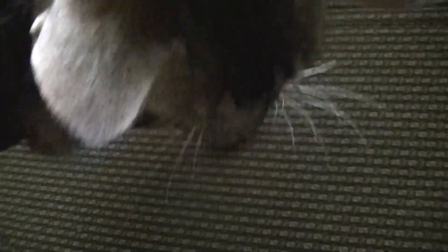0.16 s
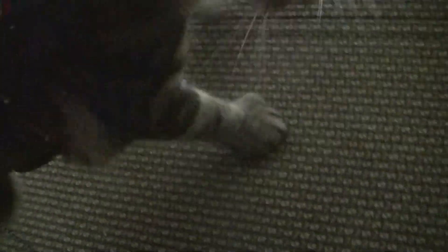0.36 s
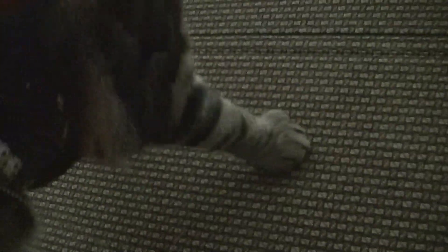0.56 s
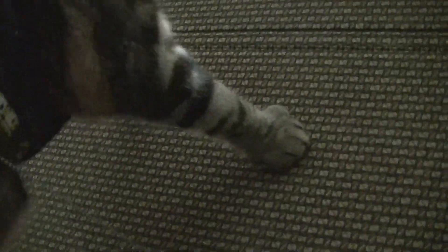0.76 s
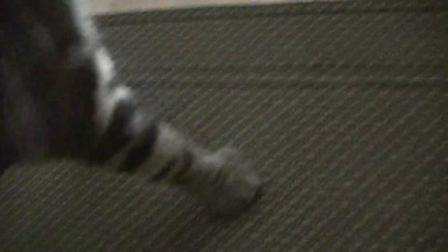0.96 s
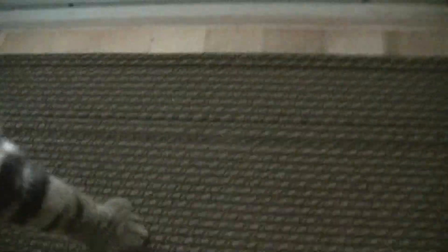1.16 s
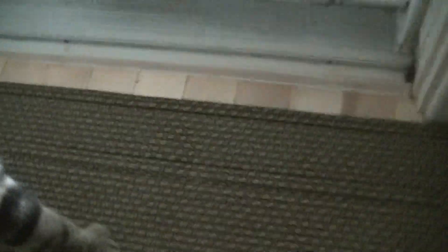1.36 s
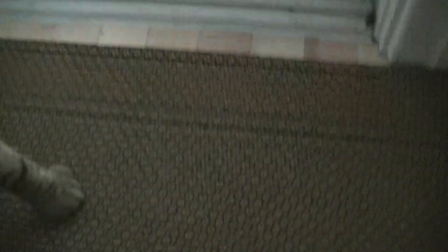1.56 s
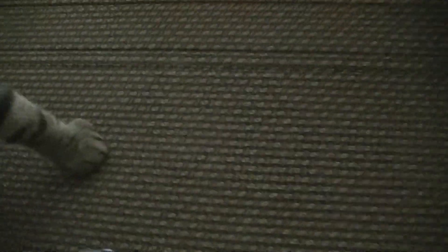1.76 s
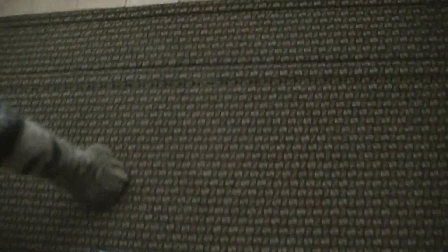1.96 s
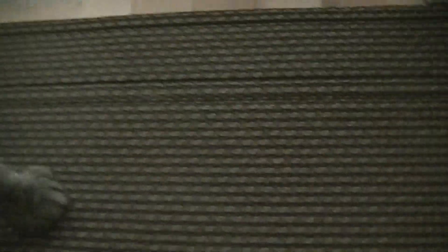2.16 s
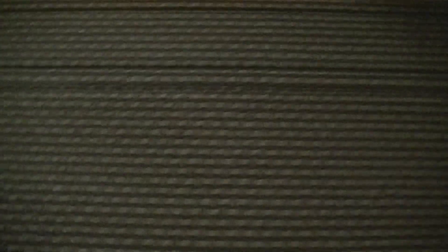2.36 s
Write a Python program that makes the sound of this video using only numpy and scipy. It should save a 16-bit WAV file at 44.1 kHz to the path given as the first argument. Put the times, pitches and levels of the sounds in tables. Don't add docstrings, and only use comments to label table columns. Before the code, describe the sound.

Cat claws catching on a stiff woven mat, close and dry. Near-quiet until sharp, loud snaps at 0.22 and 0.31 s with a brief rasping drag between; faint ticks follow. A dull paw thump and crisp snaps come at 0.79 s, then scratchy crackles to 1.1 s. Lighter clicks at 1.25-1.5, 1.7 and 2.0-2.1 s, and a small flurry at 2.2-2.3 s, over faint rustle and low room hum.

```python
import sys
import numpy as np
from scipy import signal
from scipy.fft import rfft, irfft
from scipy.io import wavfile

SR = 44100
rng = np.random.default_rng(int(sys.argv[2]) if len(sys.argv) > 2 else 0)


def wav_record(signal):
    frames = np.transpose(np.atleast_2d(signal))
    bounded = np.clip(frames, -1, 1)
    quanta = np.round(bounded * 32767).astype(np.int16)
    wavfile.write(sys.argv[1], SR, quanta)


def voltage_ratio(level):
    return 10 ** (np.asarray(level, float) / 20)


N = 105840

# frequency in Hz, level in dB per Hz.
ROOM_TONE = [(15, -33), (25, 8), (144, 2.5), (631, -5.5), (782, -6), (2300, -15.5), (3440, -19.5),
             (6920, -22), (15500, -11.5)]
# time in seconds, level in dB.
RESTLESSNESS = [(0, -44.5), (.14, -53), (.27, -45), (.43, -48), (.57, -44.5), (.74, -52.5), (0.902, -43.5),
                (.97, -45.5), (1.12, -45.5), (1.18, -52.5), (1.239, -47), (1.34, -47), (1.48, -46),
                (1.66, -52.5), (1.8, -47), (2.02, -53), (2.2, -52.5), (2.4, -52.5)]
# frequency in Hz, level in dB per Hz.
RUSTLE_COLOUR = [(180, -10.5), (420, -0.5), (1300, -6.5), (2000, -6), (2600, -2), (3400, -6), (5000, -11.5),
                 (15500, -15.5)]
# start in seconds, level in dB, decay t60 in seconds, top in Hz.
PAW_THUMPS = [(.001, -46.5, 0.28, 308), (0.235, -52, 0.19, 520), (.318, -42.5, 0.47, 177),
              (0.587, -54, 0.19, 300), (.786, -30, 0.049, 400), (.812, -34, 0.37, 203),
              (1.095, -36.5, 0.072, 366), (1.258, -42.5, 0.1, 586), (1.288, -42.5, 0.22, 410),
              (1.396, -43, 0.1, 560), (1.43, -52, 0.49, 256), (2.1, -51.5, 0.23, 170),
              (2.339, -52, 0.19, 142), (2.262, -45, 0.29, 417), (2.288, -43.5, 0.2, 317)]
# start in seconds, peak in dB, pitch in Hz,
# ring length in cycles.
CONTACT_KNOCKS = [(.02, -39.5, 108.6, 9), (.035, -41, 910, 20), (0.2254, -7, 1940, 3.9),
                  (0.2248, -13.5, 1066, 13.3), (0.2267, -23, 616, 9.5), (.238, -29, 610, 9.7),
                  (.234, -20, 2330, 12), (.3362, -16, 1800, 5.3), (0.345, -9.5, 1630, 3.3),
                  (.361, -24, 2000, 8.2), (.548, -36.5, 2790, 24), (.5855, -36, 3250, 15),
                  (0.592, -40, 950, 10), (.59, -40.5, 167, 9.6), (.6535, -37.5, 2960, 18),
                  (.673, -42, 2530, 18), (0.785, -21, 159, 5.2), (.788, -22.5, 365, 7.6),
                  (.808, -30, 270, 8.2), (0.8506, -17, 780, 2.2), (.989, -24.5, 890, 3.7),
                  (1.007, -31.5, 583, 9.9), (1.069, -39.5, 116, 11), (1.1, -29.5, 840, 1.6),
                  (1.292, -30, 386, 8.2), (1.3935, -20.5, 654, 5.2), (1.397, -28.5, 349, 9.6),
                  (1.395, -33, 136, 6.8), (1.972, -31.5, 1197, 16), (1.978, -36.5, 714, 9.2),
                  (1.976, -38.5, 2060, 77), (1.987, -37, 1150, 12), (2.065, -33.5, 680, 9),
                  (2.065, -36.5, 2370, 31), (2.099, -43, 2070, 53), (2.214, -39.5, 700, 10.4),
                  (2.2162, -27, 1160, 5.7), (2.28, -36.5, 105, 9.4), (2.272, -27, 1490, 2.4),
                  (2.2866, -19, 1670, 2.5), (2.293, -31.5, 410, 2.8), (2.298, -29.5, 606, 1.9),
                  (2.306, -32, 920, 3.6), (2.311, -21.5, 1200, 3.1)]
# start in seconds, length in seconds, level in dB, pitch in Hz.
CLAW_RASPS = [(0.267, 0.037, -33.5, 3180), (0.277, 0.042, -36, 6000), (.315, 0.093, -46, 5320),
              (0.359, 0.047, -45, 1570), (0.976, 0.03, -42, 4600), (1.07, 0.036, -42.5, 2390),
              (1.097, 0.15, -64, 2400), (1.328, 0.047, -52, 2480), (1.442, 0.19, -58, 2430),
              (1.98, 0.046, -58.5, 2920), (0.95, 0.063, -42, 12900), (2.285, .05, -46, 13500),
              (1.211, .06, -50, 6500)]
# start in seconds, length in seconds, level in dB, pitch in Hz,
# share of the stroke that swells (0 to 1).
CLAW_DRAGS = [(0.035, 0.059, -56, 3240, 0.62), (0.234, 0.012, -38.5, 7000, 0.086),
              (0.26, 0.059, -30.5, 3420, 0.6), (0.316, 0.041, -29, 1550, 0.083),
              (0.327, 0.086, -55, 4640, 0.21), (0.792, 0.0071, -43, 2100, 0.057),
              (0.821, 0.017, -35, 2180, 1), (0.848, 0.021, -36, 2380, 0.93), (0.942, 0.069, -41, 8000, 0.5),
              (0.977, 0.034, -38, 1770, 0.41), (1.026, 0.035, -43, 3420, 0.34),
              (1.061, 0.04, -37.5, 3900, 0.28), (1.116, 0.048, -51, 5500, 0.44),
              (1.248, 0.068, -39.5, 950, 0.27), (1.423, 0.098, -50, 2500, 0.099),
              (1.702, 0.024, -41, 1780, 0.17), (1.762, 0.061, -45, 2720, 0.15),
              (2.315, 0.032, -49.5, 2400, .2), (2.089, 0.015, -44, 2280, 0.33), (.64, 0.091, -51, 2800, .4),
              (2.186, 0.082, -48, 11000, 0.24), (2.206, 0.042, -43, 1750, 0.33),
              (2.258, 0.03, -41.5, 2540, 0.42), (2.283, 0.056, -42, 1730, 0.37)]
# frequency in Hz, level in dB.
WEAVE_MODES = [(680, 2.5), (1050, 2.5), (1240, 4), (1490, 1), (1820, 2.5), (2050, 4), (2400, 2),
               (2900, 2.5), (3700, -2.5), (4400, 2.5), (5200, 0), (6600, -6), (8400, -9.5), (12500, -3)]
# start in seconds, peak in dB, pitch in Hz,
# sharp edge in dB, aftershock time in seconds.
STRONG_SNAPS = [(.224, -10.5, 1550, -14, 0.0044), (0.2246, -7.5, 2740, -20.5, 0.0035),
                (0.26, -21, 3200, -31, 0.003), (0.3101, -1.5, 1660, -45, 0.0029),
                (.31, 0, 4460, -21, 0.0028), (0.3346, -31, 1800, -38, 0.00077),
                (.344, -14.5, 1620, -40, 0.0019), (0.7837, -19.5, 736, -36, 0.00067),
                (.787, -6.5, 1816, -22, 0.0012), (0.7869, -7.5, 4950, -10.5, 0.0024),
                (0.7901, -11, 2070, -19.5, 0.0047), (0.8545, -16, 2830, -13, 0.0017),
                (.867, -19, 2040, -12, 0.0014), (.987, -21.5, 4500, -4.5, 0.0032),
                (0.9958, -13, 4170, -11.5, 0.0012), (1.001, -19.5, 2600, -19, 0.0032),
                (1.025, -22, 2430, -10.5, 0.003), (1.082, -24, 2460, -5.5, 0.0096)]
# start in seconds, peak in dB, pitch in Hz,
# sharp edge in dB, aftershock time in seconds.
LIGHT_SNAPS = [(1.253, -23.5, 697, -14, 0.012), (1.395, -23.5, 1090, -12, 0.00094),
               (1.4187, -24, 2680, -10.5, 0.0062), (1.704, -27, 1390, -10.5, 0.0079),
               (1.972, -26, 2450, -16, 0.0058), (2.063, -31.5, 3500, -12, 0.0045),
               (2.096, -33, 870, -7.5, 0.0031), (2.213, -21, 1150, -12, 0.0025),
               (2.227, -29.5, 3060, -9.5, 0.0013), (2.26, -24, 1240, -5, 0.0017),
               (2.285, -20, 1610, -13, 0.0044), (2.31, -24.5, 1330, -11, 0.0029)]
# start in seconds, peak in dB, pitch in Hz, sharp edge in dB,
# aftershock time in seconds.
FIBRE_TICKS = [
    (0.46, -31.5, 3170, -17, 0.0065),
    (0.624, -30, 2780, -28, 0.0038),
    (0.707, -40, 6540, 2, .001),
    (.75, -38, 9900, 1, 0.00082),
    (1.262, -25, 4800, -10.5, 0.0018),
    (1.3135, -24.5, 2440, -32, 0.0035),
    (1.488, -29.5, 4000, -14, 0.0035),
    (1.628, -27.5, 8700, -3, 0.002),
    (1.931, -36.5, 2900, -24, 0.003),
    (2.292, -36, 12500, 0, 0.0057),
]

DRAG_GRAINS_PER_S = 12000


def rms_one(x):
    return x / np.sqrt(np.mean(x ** 2) + 1e-20)


def level_at(points, hz):
    table_hz, table_db = np.transpose(points)
    return np.interp(np.log(hz), np.log(table_hz), table_db)


def shaped(x, spectrum):
    hz = np.arange(len(x) // 2 + 1) * SR / len(x) + 1
    return rms_one(irfft(rfft(x) * voltage_ratio(level_at(spectrum, hz)), len(x)))


def filtered(x, order, hz, kind):
    return signal.sosfilt(signal.butter(order, hz, kind, fs=SR, output="sos"), x)


def drift(rate):
    r = np.exp(-80 * np.pi * rate / SR)
    noise = rng.standard_normal(N // 40 + 1002)
    slow = signal.lfilter([1], [1, -2 * r, r * r], noise)[1000:]
    return np.interp(np.arange(N) / 40, np.arange(len(slow)), rms_one(slow))


def ring(x, hz, t60):
    r, w = voltage_ratio(-60 / (t60 * SR)), 2 * np.pi * hz / SR
    return signal.lfilter([0, np.sin(w)], [1, -2 * r * np.cos(w), r * r], x + 1e-18)


def grains(size, per_s, spread_db):
    chance, luck, side = rng.random((3, size))
    height_db = spread_db * np.minimum(-np.log(luck + 1e-9), 5)
    return (chance < per_s / SR) * voltage_ratio(height_db) * np.sign(side - .5)


def add(out, s, x):
    i = int(s * SR)
    out[i:i + len(x)] += x[:len(out) - i]


def hum():
    return voltage_ratio(-52 + 1.2 * drift(2.5)) * shaped(rng.standard_normal(N), ROOM_TONE)


def rustle():
    hz = np.arange(N // 2 + 1) * SR / N
    edges_hz = [150, 1200, 4500, 17000]
    crackle = 0
    for low, high in zip(edges_hz, edges_hz[1:]):
        part = grains(N, 5000, spread_db=2.0) * voltage_ratio(1.5 * drift(14))
        crackle = crackle + irfft(rfft(part) * ((hz >= low) & (hz < high)), N)
    shuffle = rms_one(filtered(rng.standard_normal(N), 2, (78.4, 170), "band"))
    both = voltage_ratio(2) * shaped(crackle, RUSTLE_COLOUR) + voltage_ratio(-8.5 + 5.3 * drift(17)) * shuffle
    s, db = np.transpose(RESTLESSNESS)
    return voltage_ratio(np.interp(np.arange(N) / SR, s, db)) * both


def echo(x, t60, cut_hz):
    t = np.arange(12000) / SR
    tail = rng.standard_normal(len(t)) * voltage_ratio(-60 * t / t60)
    tail = filtered(tail, 1, cut_hz, "low")
    return signal.fftconvolve(x, tail / np.sqrt(np.sum(tail ** 2)))[:N]


def thumps():
    out, t = np.zeros(N), np.arange(14000) / SR
    for s, db, t60, top_hz in PAW_THUMPS:
        push = rng.standard_normal(len(t)) * voltage_ratio(-60 * t / t60) * np.minimum(t / 0.00045, 1)
        x = filtered(push, 2, [69.4, top_hz], "band")
        add(out, s, voltage_ratio(db) * x / np.sqrt(np.mean(x[t < t60 / 4] ** 2)))
    return out


def knocks():
    out, click = np.zeros(N), np.eye(1, 6000)[0]
    for s, db, hz, cycles in CONTACT_KNOCKS:
        x = ring(ring(click, hz, cycles / hz), hz, cycles / hz)
        x = filtered(x, 2, hz / 4, "high")
        add(out, s, voltage_ratio(db) * x / np.abs(x).max())
    return out


def rasps():
    out = np.zeros(N)
    for s, length, db, hz in CLAW_RASPS:
        u = np.arange(8000) / SR / length
        fade = np.abs(np.sin(np.pi * np.minimum(u, 1)))
        slips = fade * grains(len(u), DRAG_GRAINS_PER_S / 2, spread_db=3.0)
        t60 = 13 / hz
        x = ring(ring(slips, hz, t60), hz, t60)
        add(out, s, voltage_ratio(db) * x / np.sqrt(np.mean(x[u < 1] ** 2)))
    return out


def drags():
    out, pitches = np.zeros(N), np.geomspace(500, 14000, 16)
    for s, length, db, hz, rise in CLAW_DRAGS:
        u = np.arange(5000) / SR / length
        swell = np.interp(u, [0, np.clip(rise, .05, .95), 1, 1.3], [0.041, 1.0, 0.39, 0.06])
        x = 0
        for f in pitches:
            ticks = swell * grains(len(u), DRAG_GRAINS_PER_S / 8, spread_db=2.5)
            level = voltage_ratio(-8 * abs(np.log2(f / hz))) * np.sqrt(f)
            x = x + level * ring(ticks, f, 14 / f)
        add(out, s, voltage_ratio(db) * x / np.sqrt(np.mean(x[u < 1] ** 2)))
    return out


def snaps():
    below_db_per_oct, above_db_per_oct, detune = 10.5, 4.5, 0.0087
    lag_s = .0012
    out, t = np.zeros(N), np.arange(3000) / SR
    for s, db, hz, edge_db, slip_s in STRONG_SNAPS + LIGHT_SNAPS + FIBRE_TICKS:
        bends = rng.standard_normal((len(WEAVE_MODES), 2))[:, 1]
        body = 0
        for k, ((f, mode_db), bend) in enumerate(zip(WEAVE_MODES, bends)):
            kick = voltage_ratio(-9) * grains(len(t), 2500, spread_db=2.0) * np.exp(-t / (slip_s + .0003))
            kick[0] = (-1) ** k
            octaves = np.log2(f / hz)
            slope_db = above_db_per_oct * octaves if octaves > 0 else -below_db_per_oct * octaves
            mode = ring(kick, f * (1 + detune * bend), 16 / f)
            body = body + voltage_ratio(mode_db - slope_db) * rms_one(mode)
        body = body + voltage_ratio(3.4) * rms_one(ring(kick, hz, 18 / hz))
        burst = rng.standard_normal(len(t)) * np.exp(-t / (0.0023 + slip_s / 2))
        edge = filtered(burst, 2, 6000, "high")
        snap = body / np.abs(body).max() + voltage_ratio(edge_db + 3.5) * edge
        add(out, s + lag_s, voltage_ratio(db - 0.5) * snap)
    return filtered(out, 2, 330, "high")


def scene():
    cat = snaps() + drags() + thumps() + knocks()
    around = rustle() + hum()
    cat = cat + rasps()
    mid = cat + voltage_ratio(-21.5) * echo(cat, 0.33, cut_hz=880) + around
    side = voltage_ratio(-25.5) * np.roll(cat, 150) + voltage_ratio(-19) * echo(around, 0.0067, cut_hz=7200)
    side = filtered(side, 1, 144, "high")
    pan_db = 0.2
    return np.array([mid + side, mid - side]) * voltage_ratio(np.array([[pan_db / 2], [-pan_db / 2]]))


def low_pass(x):
    return signal.sosfilt(signal.butter(12, 15900, fs=SR, output="sos"), x)


def record(dry):
    heard = filtered(dry, 2, [55, 10870], "band")
    heard = signal.sosfilt(signal.cheby2(10, 50, 16600, fs=SR, output="sos"), heard)
    return low_pass(np.clip(heard, -1, 1))


dry = scene()
out = record(dry)
wav_record(out)
```